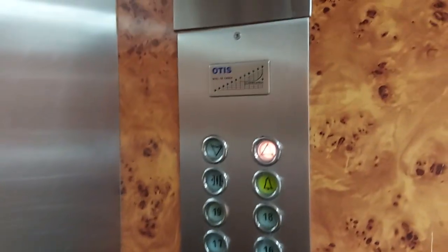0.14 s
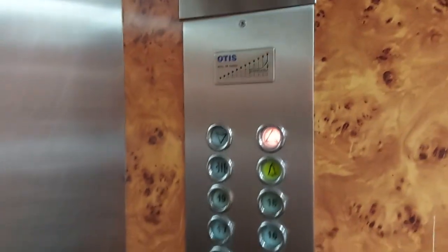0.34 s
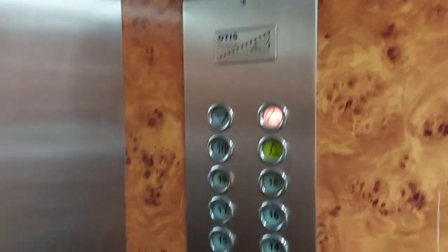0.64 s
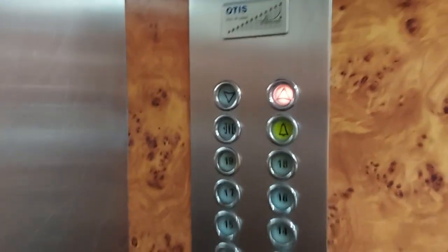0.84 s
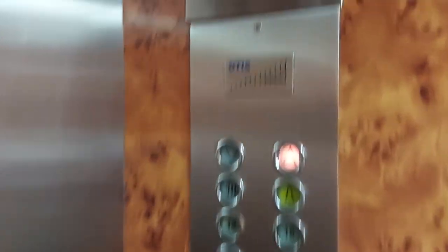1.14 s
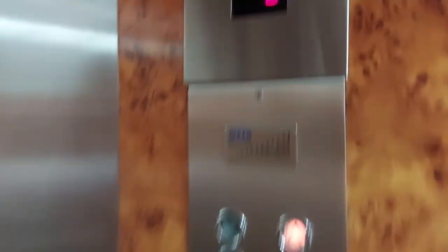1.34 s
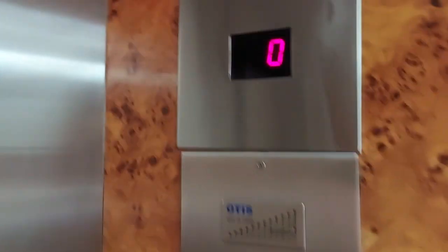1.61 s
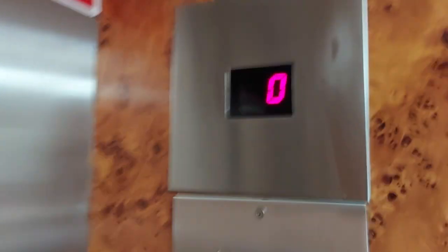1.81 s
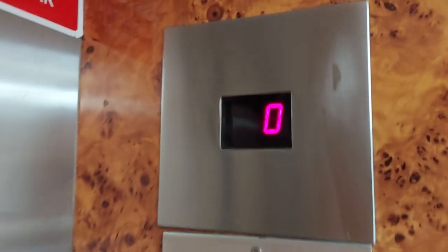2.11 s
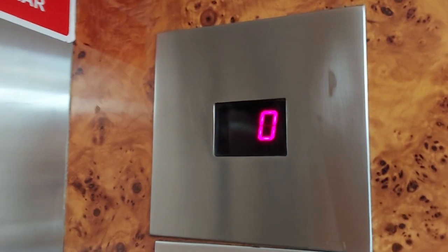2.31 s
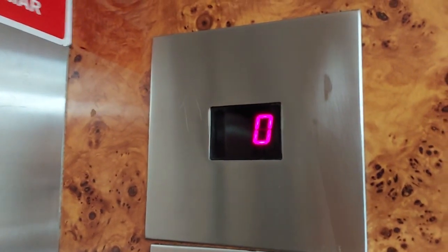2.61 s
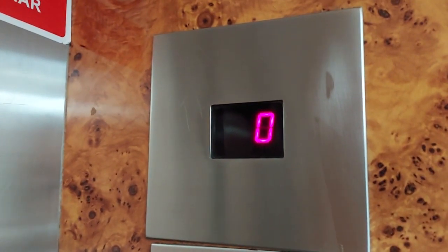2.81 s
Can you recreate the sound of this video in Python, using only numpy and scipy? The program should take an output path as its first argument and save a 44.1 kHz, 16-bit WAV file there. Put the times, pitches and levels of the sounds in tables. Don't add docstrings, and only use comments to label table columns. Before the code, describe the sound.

Inside an elevator car, a loud low electric hum stops abruptly at half a second with a deep double thud and dragging door gear; after a lull, a low rumble builds with soft hiss. Close handheld phone microphone.

```python
import sys
import numpy as np
from scipy import signal
from scipy.io import wavfile

SR = 44100
rng = np.random.default_rng(int(sys.argv[2]) if len(sys.argv) > 2 else 0)


def int16_out(signal):
    q = np.round(np.clip(np.atleast_2d(signal).T, -1, 1) * 32767)
    wavfile.write(sys.argv[1], SR, q.astype(np.int16))


def invert_db(x):
    u = np.asarray(x, float) / 20
    return 10 ** u


N = 130095
TIME = np.arange(N) / SR

# frequency in Hz, level in dB per Hz.
FLOOR_COLOUR = [(15, -29), (25, 6), (46, 5.5), (198, -14), (274, -31), (368, -41.5), (567, -34.5),
                (826, -29), (15500, -41.5)]
FLOOR_DB = -58
# frequency in Hz, correlation from 0 to 1.
LIKENESS = [(60, 1.0), (240, 1), (950, 0.097), (3770, 0.08), (15000, 0.0033)]
# frequency in Hz, left minus right in dB.
LEAN = [(60, 4), (240, 1.5), (950, -3), (3770, -7), (15000, 6.5)]
PATCH_SHARED = .4

# time in seconds, level in dB.
SEAL = [(0, -84.5), (.066, -88.5), (.118, -74.5), (.17, -80.5), (.3, -88.5), (.57, -90), (.58, -73.5),
        (.614, -72), (.66, -80.5)]
# centre in Hz, width in Hz, level in dB.
SEAL_BANDS = [(9500, 5000, -5), (14800, 2500, 1)]

# time in seconds, level in dB.
AIR = [(1.5, -78), (1.56, -75.5), (1.9, -70), (2.07, -71), (2.1, -58), (2.155, -61.5), (2.2, -71.5),
       (2.33, -75.5), (2.45, -86.5)]
# frequency in Hz, level in dB per Hz.
AIR_COLOUR = [(3000, 3.5), (5000, 2), (7500, -1.5), (10500, -4), (13500, -1.5)]

# start in seconds, peak level in dB.
TICKS = [(0.544, -56), (.573, -49), (.652, -54), (.802, -53), (1.1876, -53), (1.5349, -51.5), (1.6136, -55),
         (2.0236, -50), (2.326, -58.5), (2.5006, -56.5), (2.5405, -63.5), (2.62, -59), (2.66, -56.5),
         (2.7525, -65), (2.8368, -58), (2.9081, -48)]
TICK_T60_S, TICK_OFFSET_DB = 0.11, -14

# start in seconds, level in dB, panel mode in Hz.
CHIRPS = [
    (0.043, -37, 890),
    (0.139, -42.5, 1196),
    (0.819, -33, 252),
    (0.692, -35, 490),
    (.79, -44.5, 953),
    (.8, -53, 1220),
]
CHIRP_S, CHIRP_RING_S = .16, .06

# middle in seconds, half length in seconds, level in dB, pitch in Hz.
GROANS = [(.24, 0.13, -45.5, 353), (.315, 0.055, -58.5, 1100), (.6, 0.15, -40, 167),
          (0.698, 0.1, -43.5, 352), (0.69, 0.12, -47, 293), (0.92, .16, -44, 139), (0.97, 0.13, -37, 101),
          (0.19, 0.15, -54.5, 790), (.33, 0.099, -54.5, 760), (2.9, 0.13, -46, 150), (1.21, 0.18, -53, 155),
          (1.5, 0.13, -49, 141), (1.72, 0.08, -49, 165), (1.85, 0.39, -43.5, 110), (2.14, 0.15, -50, 278),
          (2.236, 0.23, -51, 244), (2.12, 0.22, -37, 94.66), (2.483, 0.2, -47, 165),
          (2.567, 0.25, -52.5, 226), (2.638, 0.11, -40.5, 170), (2.827, 0.093, -53, 297)]
GROAN_ROUGH_DB, GROAN_GLIDE = 3.5, 0.052

# start in seconds, peak level in dB, brightness in dB per third of an octave.
LATCH = [
    (.3646, -52, 1),
    (0.37, -58, 1),
    (.383, -64, -6),
    (.3865, -69, 7),
    (.408, -69.5, 3),
]
# frequency in Hz, level in dB, t60 in seconds.
LATCH_MODES = [(5400, -17, .004), (6270, -10.5, 0.0071), (8130, -3, 0.015), (9800, -7.5, .004),
               (11500, -18.5, .004), (13910, -14, .004)]
LATCH_SNAP_S, LATCH_TAIL_S, LATCH_TAIL_DB = .012, .18, -15

# time in seconds, level in dB.
DRAG = [(.53, -70), (.568, -60.5), (.58, -55), (.7, -53), (.81, -54), (.89, -57), (.93, -63), (.96, -64),
        (1.0, -74), (1.17, -72), (1.195, -66), (1.27, -77)]
# frequency in Hz, level in dB per Hz.
DRAG_COLOUR = [(150, -23.5), (240, -8), (350, -6.5), (500, -4), (800, -12), (2000, -14.5), (4500, -27.5),
               (8350, -37), (15500, -35.5)]

# time in seconds, level in dB.
GUIDES = [(1.3, -85.5), (1.5, -78), (1.54, -73), (1.63, -66.5), (1.69, -73.5), (1.79, -66), (2.0, -70.5),
          (2.04, -61.5), (2.12, -61), (2.24, -62), (2.41, -70.5), (2.52, -66), (2.68, -63.5), (2.75, -69.5),
          (2.85, -66), (2.95, -60.5)]
# frequency in Hz, level in dB per Hz.
GUIDE_COLOUR = [(250, -29), (500, -10), (900, -18), (1900, -19), (3000, -33.5), (4600, -38), (8000, -53),
                (15500, -54)]
# centre in Hz, width in Hz, level in dB.
SHOE_BANDS = [(1750, 330, -1), (2340, 320, -6.5)]
SHOE_DB, SHOE_FLUTTER_DB = -9, 7

# time in seconds, pitch in Hz, rms level in dB.
DRIVE = [(1.381, 60.38, -49.5), (1.55, 62.28, -42.5), (1.7, 65.74, -35), (1.89, 69.06, -32.5),
         (2.05, 68.75, -37), (2.17, 68.26, -43.5), (2.259, 69.98, -39), (2.4, 71.24, -42.5),
         (2.53, 72.68, -34), (2.701, 71.57, -31), (2.736, 71.55, -45), (2.778, 71.8, -31),
         (2.87, 70.1, -30.5), (2.95, 74.7, -36)]
# multiple of the pitch, level in dB.
DRIVE_ORDERS = [(2, -21.5), (3, -33), (4, -30)]
DRIVE_WOBBLE_DB, DRIVE_WOBBLE_HZ = 1, 1.1

# time in seconds, rms level in dB.
HUM = [(0, -15), (.1, -15.5), (.17, -15.5), (.33, -17.5), (.4, -16.5), (.43, -18.5), (.455, -13),
       (.475, -16.5), (.5, -46)]
HUM_HZ, HUM_SECOND_DB = 100.0, -36
# time in seconds, level in dB.
DOOR_RUN = [(0, -48), (.06, -43.5), (.12, -49), (.2, -45.5), (.27, -49), (.33, -48), (.4, -42.5),
            (.48, -48), (.56, -55)]
# frequency in Hz, level in dB per Hz.
DOOR_COLOUR = [(150, -14), (326, -10), (1200, -23.5), (2300, -34), (2700, -45), (15500, -61.5)]
# frequency in Hz, width in Hz, level in dB.
DOOR_RINGS = [(332, 10, 1.5), (490, 30, -4.5), (775, 22, -3), (890, 18, -12.5), (1260, 25, -11.5),
              (2246, 55, -18.5)]
DOOR_RINGS_DB = -6

# start in seconds, level in dB, signed push, favoured pitch in Hz.
THUDS = [(.485, -16.5, 0.28, 158), (.508, -23, 1, 120), (0.5342, -12, 0.87, 75.4), (.539, -4.5, 1, 59),
         (.556, -12, -0.27, 76.4), (.572, -19.5, -0.57, 115), (.591, -11.5, -0.78, 59.6),
         (.64, -30, 0.51, 178), (0.759, -22.5, 0.65, 123), (0.804, -23, 0.42, 99), (0.874, -15, 0.17, 103)]
THUD_SPREAD_DB, THUD_SOFT_Q, THUD_T60_S = 31, 1.46, 0.14
# frequency in Hz, level when shaken in dB, t60 in seconds.
BODY = [(47.67, -5.5, 1), (72.5, -15.5, 0.11), (95.22, -6, 0.44), (115.6, -15, 0.65), (146.7, -16, 0.24),
        (171.5, -23.5, 0.4), (231.3, -20.5, 0.3), (290.7, -26, 0.52), (337, -29.5, .2), (490, -28.5, 0.15)]
# time in seconds, level in dB.
SHAKE = [(0, -35.5), (.45, -34.5), (.55, -28.5), (.7, -31), (.92, -34.5), (1.0, -41.5), (1.25, -47),
         (1.45, -47), (1.6, -47), (1.75, -39.5), (2.0, -37.5), (2.2, -33), (2.4, -38.5), (2.55, -34.5),
         (2.75, -33.5), (2.95, -35.5)]
SHAKE_STEEPENS = 0.13

MIC_LOW_CUT_HZ = 41
# centre in Hz, width in Hz, boost in dB.
MIC_PEAKS = [(1707, 47, 5), (2150, 150, 5), (4490, 960, 4), (1420, 610, -2.5), (10600, 2400, -2)]

OPPOSITE = np.array([[1], [-1]])


def rms_one(x):
    return x / np.sqrt(np.mean(x ** 2) + 1e-20)


def level(rows, fade_s=0.019):
    s, db = np.array(rows)[:, 0], np.array(rows)[:, -1]
    s = np.r_[s[0] - fade_s, s, s[-1] + fade_s]
    return invert_db(np.interp(TIME, s, np.r_[-120, db, -120]))


def at_hz(points, hz):
    table_hz, value = np.array(points)[:, 0], np.array(points)[:, 1]
    return np.interp(np.log(hz), np.log(table_hz), value)


def drift(rate):
    r = np.exp(-80 * np.pi * rate / SR)
    slow = signal.lfilter([1], [1, -2 * r, r * r], rng.standard_normal(N // 40 + 2002))[2000:]
    return np.interp(np.arange(N) / 40, np.arange(len(slow)), rms_one(slow))


def ring(x, hz, t60):
    r, w = invert_db(-60 / (t60 * SR)), 2 * np.pi * hz / SR
    return signal.lfilter([0, np.sin(w)], [1, -2 * r * np.cos(w), r * r], x + 1e-18)


def clicks(s, gain):
    out = np.zeros(N)
    out[(np.asarray(s) * SR).astype(int)] = gain
    return out


def dying(s, db, t60):
    return signal.lfilter([1], [1, -invert_db(-60 / (t60 * SR))], clicks(s, invert_db(db)) + 1e-18)


def band_pass(x, low_hz, high_hz, order=2):
    return signal.sosfilt(signal.butter(order, [low_hz, high_hz], "band", fs=SR, output="sos"), x)


def bands(rows):
    white = rng.standard_normal((2, N))
    out = 0
    for hz, width, db in rows:
        out = out + invert_db(db) * rms_one(band_pass(white, hz - width / 2, hz + width / 2))
    return out


def hiss(colour, patchy_db, low_hz, top_hz=15600):
    out, power, together = 0, 0, drift(4)
    edges = 22 * 2 ** np.arange(0, 9.6, .5)
    white = rng.standard_normal((2, 2, N))
    lowest = colour[0][0]
    for k, (low, high) in enumerate(zip(edges, edges[1:])):
        hz = np.sqrt(low * high)
        if hz < lowest / 2:
            continue
        mid, side = band_pass(white[k % 2], low, high)
        alike = np.clip(at_hz(LIKENESS, hz), 0, 1)
        flicker_db = patchy_db * (PATCH_SHARED * together + drift(22))
        bass_loss_db = 7.8 * max(np.log2(lowest / hz), 0)
        gain = invert_db(at_hz(colour, hz) - bass_loss_db + flicker_db) * invert_db(at_hz(LEAN, hz) / 2 * OPPOSITE)
        band = gain * (np.sqrt(1 + alike) * mid + np.sqrt(1 - alike) * side * OPPOSITE)
        out = out + band
        if low_hz < hz < top_hz:
            power += np.mean(band.mean(0) ** 2)
    return out / np.sqrt(power)


def car_air():
    return invert_db(FLOOR_DB) * hiss(FLOOR_COLOUR, patchy_db=-3.5, low_hz=22)


def door_seals():
    return level(SEAL) * bands(SEAL_BANDS)


def passing_air():
    return level(AIR, fade_s=.2) * hiss(AIR_COLOUR, .7, low_hz=3000)


def gear_ticks():
    s, db = np.transpose(TICKS)
    shape = dying(s, db + TICK_OFFSET_DB, TICK_T60_S)
    burst = band_pass(rng.standard_normal((2, N)), 1300, 5000, order=1)
    return shape * rms_one(burst) * invert_db(-2.2 * OPPOSITE)


def trim_chirps():
    white = rng.standard_normal((2, N))
    out = 0
    for s, db, hz in CHIRPS:
        out = out + ring(dying([s], db, CHIRP_S) * white, hz, CHIRP_RING_S)
    return out / np.sqrt(CHIRP_RING_S * SR / 28)


def panel_groans():
    out = 0
    for s, length, db, hz in GROANS:
        u = np.clip((TIME - s) / length, -1, 1)
        turns = hz * (TIME + GROAN_GLIDE * rng.normal() * length * u ** 2 / 2)
        out = out + invert_db(db - 1.5) * np.cos(np.pi * u / 2) ** 2 * np.sin(2 * np.pi * turns)
    return out * invert_db(GROAN_ROUGH_DB * drift(7.6))


def latch():
    s, db, tilt = np.transpose(LATCH)
    out = 0
    for hz, level_db, t60 in LATCH_MODES:
        hit_db = db + level_db + tilt * np.log2(hz / 8000) * 3 + rng.normal(0, 0.9, len(s))
        shape = dying(s, hit_db, LATCH_SNAP_S) + dying(s, hit_db + LATCH_TAIL_DB, LATCH_TAIL_S)
        white = rng.standard_normal((2, N))
        scrape = shape * (white + .7 * white[::-1])
        out = out + ring(scrape, hz, t60) / np.sqrt(t60 * SR / 28)
    return out * invert_db(np.array([[2.0], [-2.5]]))


def gear_drag():
    return level(DRAG) * hiss(DRAG_COLOUR, .6, low_hz=1200, top_hz=8000)


def guide_shoes():
    slide = level(GUIDES) * hiss(GUIDE_COLOUR, .7, low_hz=1200, top_hz=6000)
    rasp = level(GUIDES) * invert_db(SHOE_DB + SHOE_FLUTTER_DB * drift(25)) * bands(SHOE_BANDS)
    return slide + rasp


def hoist_drive():
    s, hz, _ = np.transpose(DRIVE)
    pitch = np.interp(TIME, s, hz) + DRIVE_WOBBLE_HZ * drift(4.38)
    phase = 2 * np.pi * np.cumsum(pitch) / SR
    tone = invert_db(DRIVE_WOBBLE_DB * drift(23)) * np.sin(phase)
    for order, db in DRIVE_ORDERS:
        tone += invert_db(db + 2.6 * drift(10)) * np.sin(order * phase)
    return np.sqrt(2) * level(DRIVE, fade_s=0.16) * tone


def door_drive():
    phase = 2 * np.pi * HUM_HZ * (TIME - .005)
    hum = np.sqrt(2) * level(HUM) * (np.sin(phase) + invert_db(HUM_SECOND_DB) * np.sin(2 * phase))
    white = rng.standard_normal((2, N))
    rings = 0
    for hz, width, db in DOOR_RINGS:
        panel = rms_one(ring(white + .4 * white[::-1], hz, 5.5 / width))
        rings = rings + invert_db(db + 2.7 * drift(9.2)) * panel
    running = hiss(DOOR_COLOUR, patchy_db=2.0, low_hz=250, top_hz=1500)
    return hum + level(DOOR_RUN) * (running + invert_db(DOOR_RINGS_DB) * rings)


def car_body():
    s, db, push, pitch = np.transpose(THUDS)
    out = np.zeros((2, N))
    shake_db = 20 * np.log10(level(SHAKE)) + 38
    for hz, shaken_db, t60 in BODY:
        blows = clicks(s, push * invert_db(db - THUD_SPREAD_DB * np.log2(hz / pitch) ** 2))
        blows = signal.lfilter(*signal.iirpeak(hz, THUD_SOFT_Q, fs=SR), blows + 1e-18)
        thud = ring(blows, hz, min(THUD_T60_S, t60))
        mid, side = rng.standard_normal((2, N))
        shake = mid + np.clip(hz / 700, 0, 1) ** 1.1 * side * OPPOSITE
        gain = invert_db(shaken_db - 38 + shake_db * (1 + SHAKE_STEEPENS * np.log2(hz / 48)))
        out += thud + gain * rms_one(ring(shake, hz, t60))
    return out


def scene():
    background = car_air() + door_seals() + passing_air()
    small_parts = gear_ticks() + trim_chirps() + panel_groans() + latch()
    machinery = gear_drag() + guide_shoes() + hoist_drive() + door_drive()
    return background + small_parts + machinery + car_body()


def low_pass(x):
    return signal.sosfilt(signal.butter(12, 15760, fs=SR, output="sos"), x)


def record(dry):
    lead = SR // 10
    low_cut = signal.butter(4, MIC_LOW_CUT_HZ, "high", fs=SR, output="sos")
    x = signal.sosfilt(low_cut, np.c_[dry[:, :lead], dry])
    for hz, width, db in MIC_PEAKS:
        x = x + (invert_db(db) - 1) * signal.lfilter(*signal.iirpeak(hz, hz / width, fs=SR), x)
    return low_pass(x[:, lead:])


dry = scene()
out = record(dry)
int16_out(out)
```